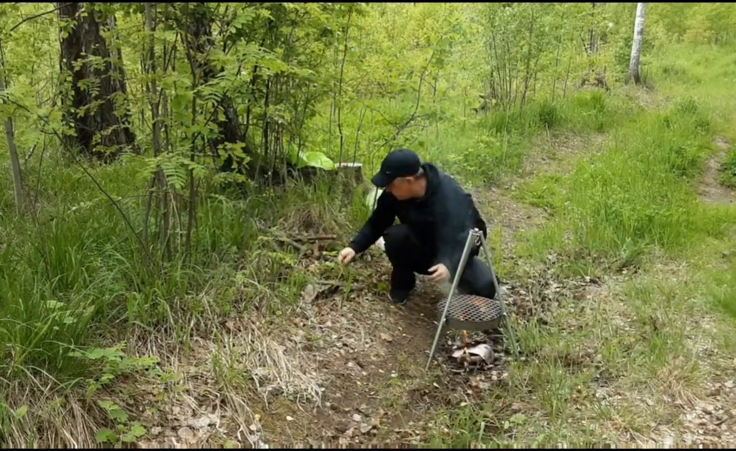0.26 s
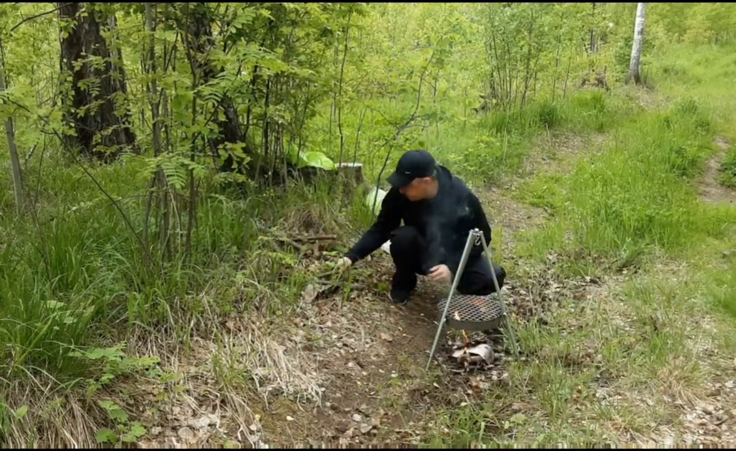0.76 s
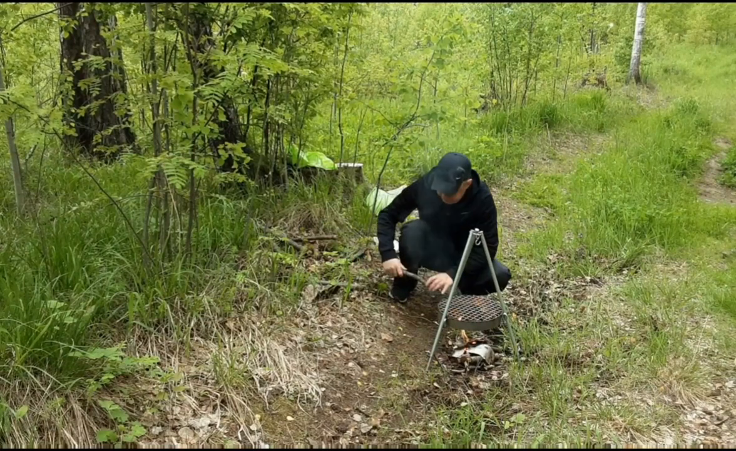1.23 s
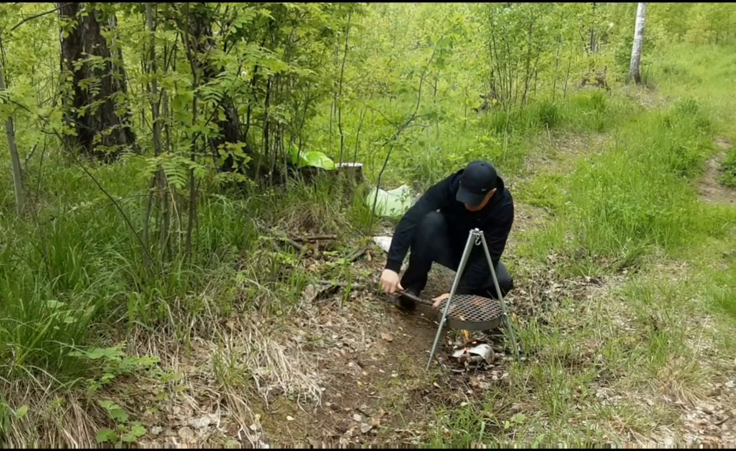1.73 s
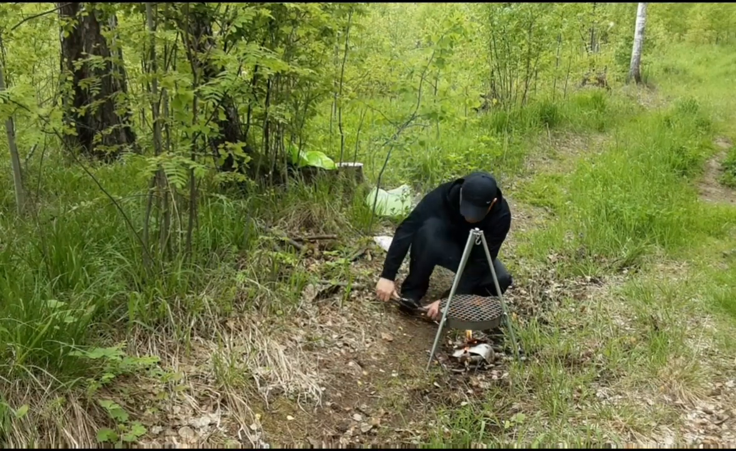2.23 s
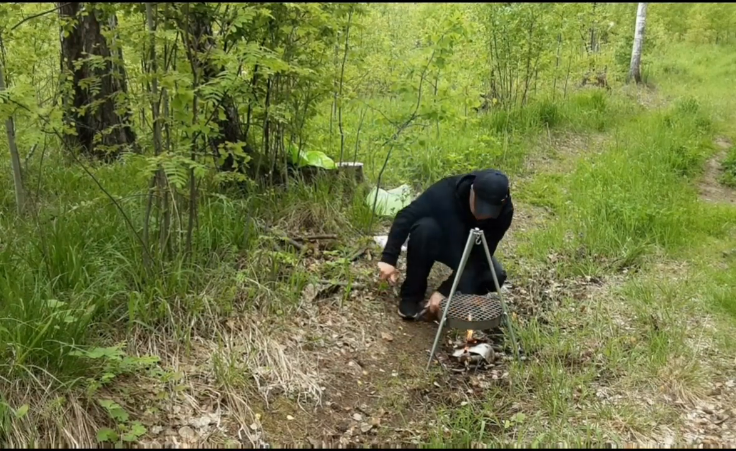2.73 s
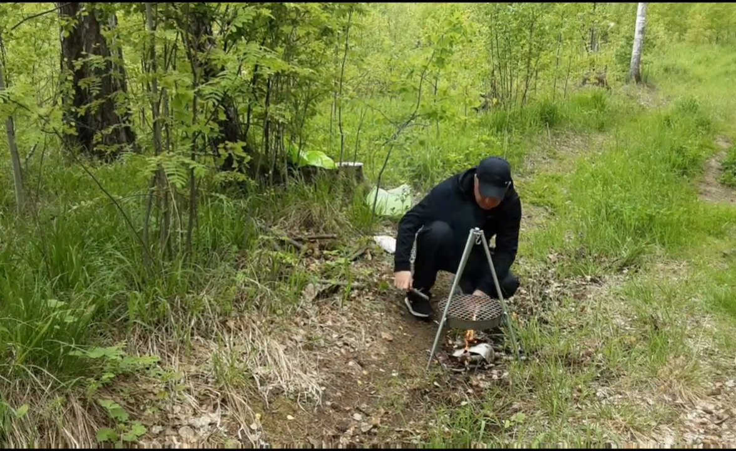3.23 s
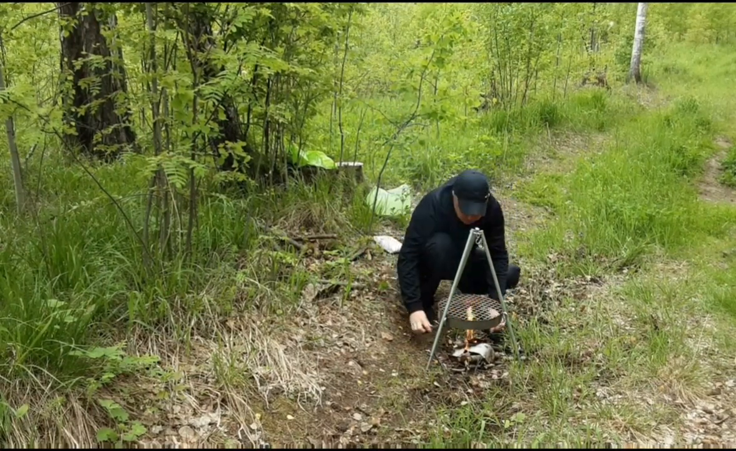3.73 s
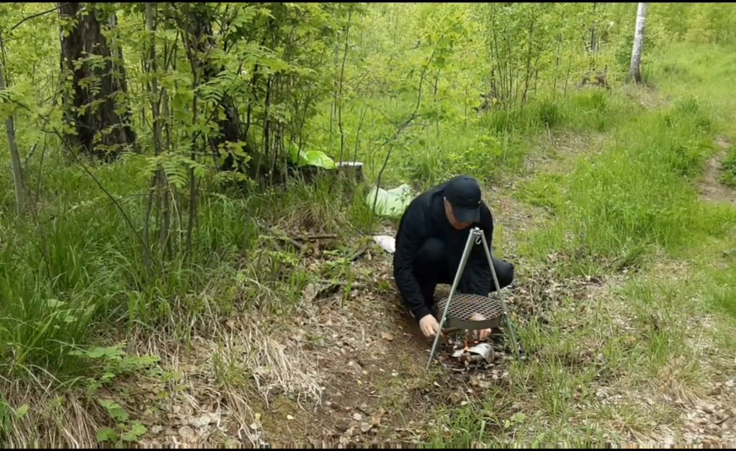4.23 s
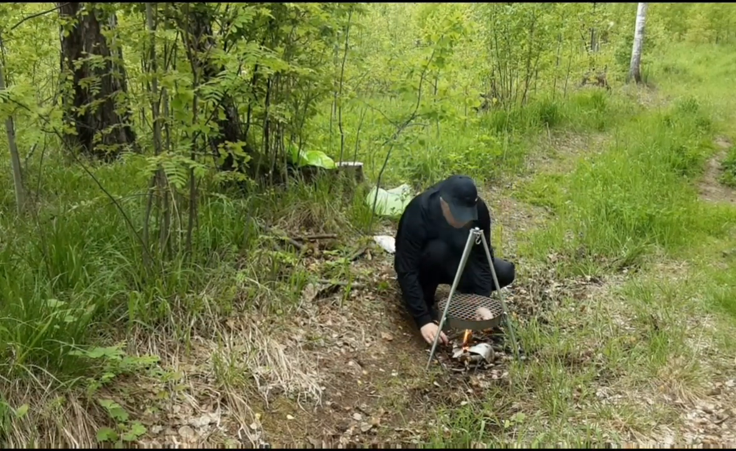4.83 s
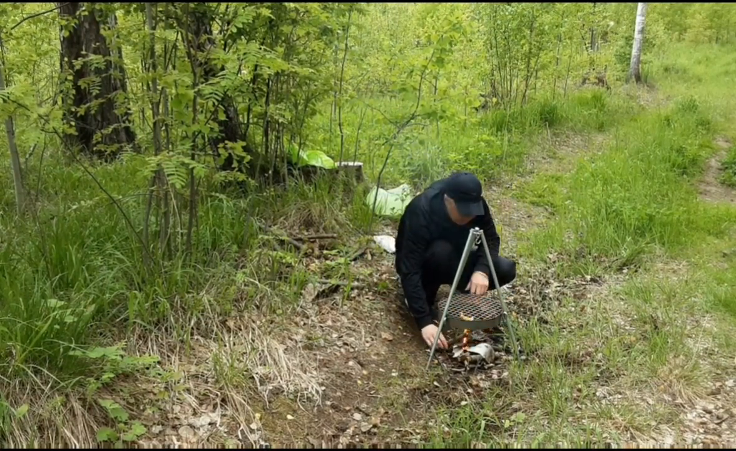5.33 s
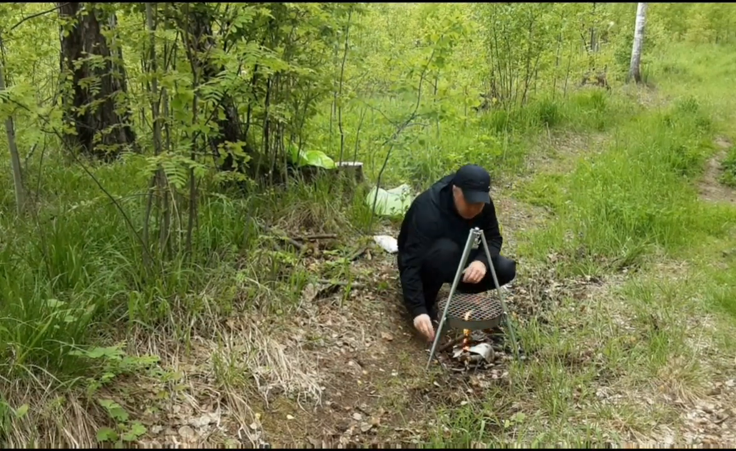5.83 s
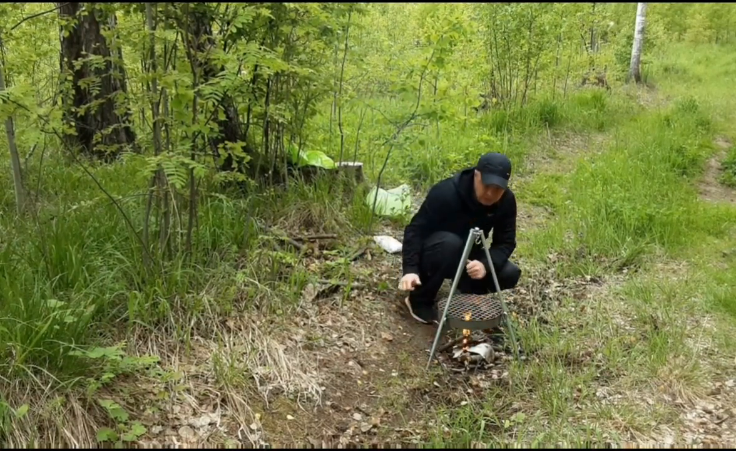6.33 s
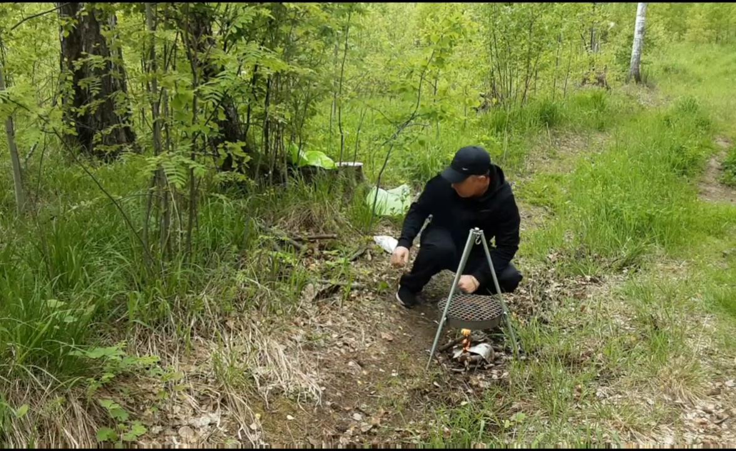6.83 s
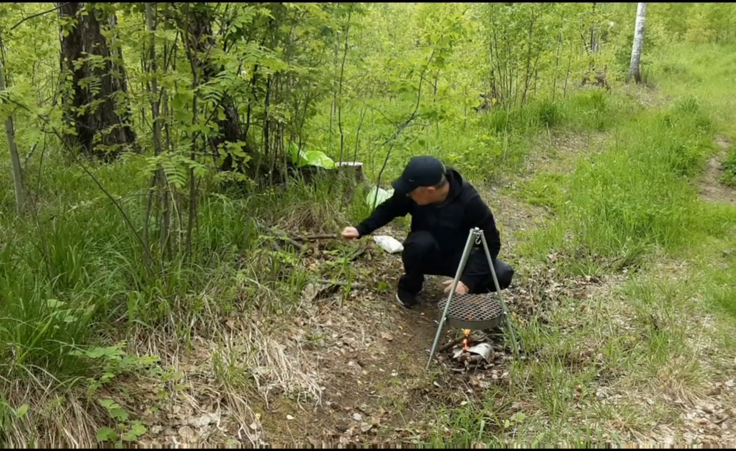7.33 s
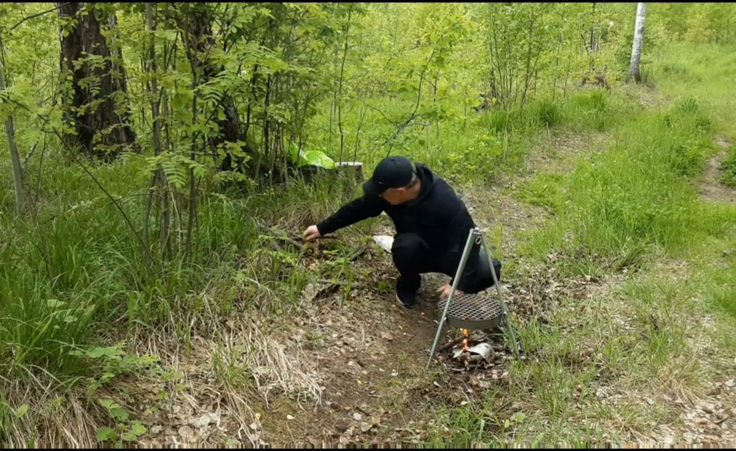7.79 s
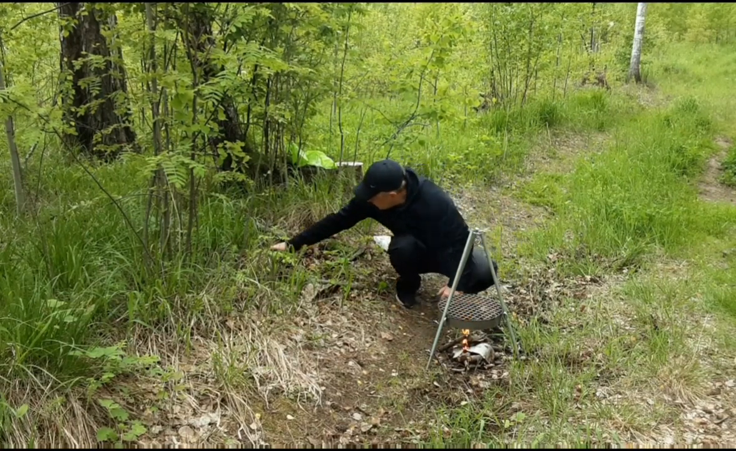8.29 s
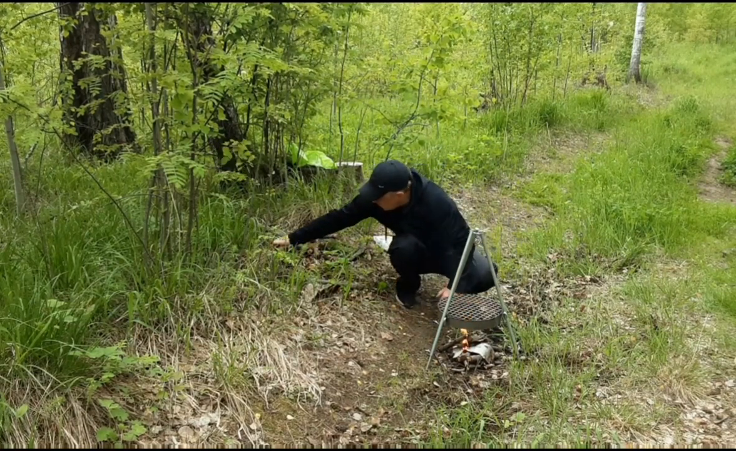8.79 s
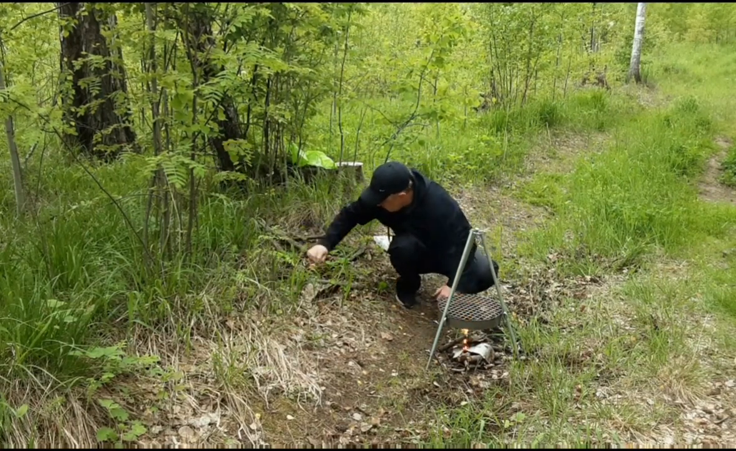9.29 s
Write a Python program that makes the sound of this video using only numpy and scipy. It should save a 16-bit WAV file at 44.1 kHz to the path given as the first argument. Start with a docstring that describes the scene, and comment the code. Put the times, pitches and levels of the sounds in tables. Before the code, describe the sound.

Someone stirs dry leaves and cracks small twigs beside a faintly ticking fire in the woods. Early on, a stick breaks with one loud snap that echoes briefly, followed a second later by a smaller crack. Light cracks and rustles continue. Throughout, a small bird repeats a high falling chirp over fainter birds, a soft foliage hiss and a distant road, all heard from a few steps away.

```python
"""Kindling at a campfire

A distant road murmurs, foliage hisses, and a small bird repeats one falling chirp, with fainter birds
further off. By a faintly ticking fire someone stirs dry leaves, cracks twigs and breaks a stick.
Each fracture excites damped modes of the wood; the trees scatter the cracks and the birdsong."""
import sys
import numpy as np
from scipy import signal
from scipy.fft import rfft, irfft, next_fast_len
from scipy.io import wavfile

SR = 44100
rng = np.random.default_rng(int(sys.argv[2]) if len(sys.argv) > 2 else 0)


def digitize_waveform(pressure):
    """Quantize a signal to 16-bit integers and store it at the path in sys.argv[1].

    Rows of a 2-D input are taken as channels; values are limited to [-1, 1].
    """
    field = np.atleast_2d(pressure).T
    bounded = np.clip(field, -1, 1)
    quanta = np.round(bounded * 32767).astype(np.int16)
    wavfile.write(sys.argv[1], SR, quanta)


N = 421155
TIME = np.arange(N) / SR

# Levels are relative within each table.
# Envelopes of tyre roar, foliage hiss and one engine note: t/s, level/dB
TYRE_LEVEL = [(0.0, -44.5), (0.42, -45), (2.47, -45), (3.62, -46.5), (4.18, -43.5), (4.39, -44.5),
              (4.92, -45), (9.55, -46)]
FOLIAGE_LEVEL = [(0.0, -66), (0.29, -66), (3.48, -70), (4.01, -67.5), (8.43, -69.5), (8.83, -67.5),
                 (9.55, -71)]
ENGINE_LEVEL = [(0, -66), (6.3, -71), (7.2, -59), (8.7, -63.5), (9.2, -52), (9.55, -52)]
# Spectra of tyres, engines, a heavy vehicle and foliage: f/Hz, level/dB
TYRE_SPECTRUM = [(90, -6.5), (115, -1.5), (146, -1.5), (182, -6.5), (235, -4), (420, -1), (660, 1),
                 (1050, -2.5), (1550, -11), (1900, -17), (2600, -28), (3200, -34.5), (4200, -41),
                 (8000, -62.5)]
RUMBLE_SPECTRUM = [(20, -39), (32, -20), (45, -11), (56, -2), (63, 2), (72, -2.5), (85, -10), (100, -18.5),
                   (160, -34)]
GROWL_SPECTRUM = [(170, -3.5), (300, -1.5), (450, -3.5)]
FOLIAGE_SPECTRUM = [(2000, -8.5), (3200, -10), (4000, -6), (5000, -4), (5900, -1.5), (6800, 0.5),
                    (7900, 1.5), (8750, -5), (9700, -9), (11000, -15.5), (13000, -16), (16000, -18)]
# Passage of the heavy vehicle: loudest t/s, half-duration/s, rise in rumble/dB
PASSAGE = (1.7, 0.51, 4.1)
# Electronic whine: f/Hz, level/dB
WHINE_TONES = [(10341, -93), (14277, -93)]
# Distant hoot: t/s, duration/s, f/Hz, level/dB
HOOT_NOTES = [(2.88, 0.57, 505, -50.5)]
# Far birds: t/s, duration/s, start f/Hz, end f/Hz, level/dB
FAR_NOTES = [(0, 0.068, 6350, 6500, -63), (.68, .25, 6700, 5500, -71), (1.95, .09, 6150, 5950, -65),
             (2.35, .09, 7200, 8000, -63), (3.66, .04, 6450, 6600, -65), (3.958, 0.14, 7900, 7560, -60),
             (4.702, 0.076, 5750, 5250, -68), (8.17, .05, 3180, 3180, -69), (8.71, 0.043, 2900, 2880, -65)]
# Near bird: t/s, final f/Hz, duration/s, level/dB
NEAR_CHIRPS = [(0.475, 5000, 0.057, -48), (1.28, 4820, 0.066, -50.5), (2.056, 4900, 0.05, -50.5),
               (2.721, 4930, 0.056, -51.5), (3.431, 4820, 0.062, -49.5), (4.086, 4810, 0.05, -48),
               (4.783, 4950, 0.04, -51), (5.514, 4860, 0.059, -50.5), (6.212, 4820, 0.055, -49.5),
               (6.943, 4930, 0.043, -51.5), (7.56, 4860, 0.059, -51.5), (8.396, 4920, 0.056, -51.5),
               (9.246, 4770, 0.068, -48)]
# Stirs of the leaf litter: t/s, core duration/s, centre f/Hz, level/dB
LEAF_STIRS = [(0, 0.61, 9000, -73), (0.7, .18, 7500, -70), (.9, 0.88, 3000, -72), (1.439, 0.14, 9000, -69),
              (2.23, 0.06, 9500, -70), (3.979, 0.5, 4800, -70), (6.47, .15, 10500, -77),
              (6.85, .04, 5000, -65), (6.962, .07, 4500, -68), (7.13, 0.097, 5000, -67),
              (8.519, 0.56, 10500, -70.5), (9.11, 0.089, 8000, -66.5)]
# Louder twig cracks: t/s, level/dB, thickness (body over top)/dB, ring (extra tick)/dB
TWIG_CRACKS = [(0.2099, -50, -1, 0), (0.7173, -45, 6, -4), (0.835, -47.5, 11, -1), (0.9547, -43, 17, -4),
               (0.9901, -50.5, 4, 12), (1.0695, -47, 22, 0.5), (1.1638, -50, 21, -2),
               (2.7147, -46.5, 19, 3), (3.0983, -50.5, -5, -5), (3.6027, -31, 5, -3.5),
               (4.1525, -50, 5, 4.5), (4.6483, -50.5, -7, 3), (4.9437, -47, -2, 0), (6.554, -49.5, -4, -1),
               (6.9591, -52, 6, 0), (7.1247, -48, 1, 6.5), (7.1965, -52, -2, 0), (7.4011, -50, -1, -3),
               (7.5188, -51.5, 8, 1), (8.5001, -52.5, 4, 2), (9.1207, -45, 0, -0.5)]
# Modes of a twig (woody body, bright tick, crisp top) and of the stick: f/Hz, level/dB, T60/s
BODY_MODES = [(1500, -3, .007), (2340, 0.5, 0.0057), (2950, -0.5, 0.0052), (3900, -3, 0.0034),
              (5040, 0, 0.0033)]
TICK_MODES = [(5950, -4, 0.0062), (6900, -0.5, 0.0082), (7900, -0.5, 0.0066), (8570, -5.5, 0.0041)]
TOP_MODES = [(10300, 2.5, 0.004), (12100, -8, .003), (14000, 5, .002)]
STICK_MODES = [(490, -4, 0.0069), (780, 0, 0.0032), (1200, -12.5, 0.015), (1590, -16.5, 0.0095),
               (2340, -26, 0.015), (3100, -24, 0.0041), (3940, -21.5, 0.006), (5780, -11.5, 0.0029),
               (7230, -2.5, 0.0033), (7940, -6, 0.0025), (9600, -19, .0015), (12000, -30, 0.0024),
               (13800, -15, .0015)]
# The two steps in which the stick gives way: t/s, level/dB
FRACTURES = [(2.5894, -0.5), (2.5916, -13)]
# Impact of its broken end on the soil: delay after the first fracture/s, f/Hz, duration/s, level/dB
SOIL_IMPACT = (.0095, 165, .013, -19)
# Spectra of tearing fibres, the long echo and its quickly absorbed top: f/Hz, level/dB
FIBRE_SPECTRUM = [(1500, -7), (2400, 0.5), (3600, -9), (5000, -1), (7000, 3), (8600, 3), (10000, 1),
                  (11500, -11), (16000, -19)]
ECHO_SPECTRUM = [(1200, -4), (2300, -4), (3600, -5), (5000, -2), (6500, 3), (7800, 6), (9300, -2.5),
                 (11000, -16), (16000, -28)]
ECHO_TOP_SPECTRUM = [(7000, -8), (9500, 5.5), (11500, -3), (13500, -4), (16000, -9)]


def from_db(db):
    """Amplitude ratio: a factor of ten for every 20 dB."""
    return 10 ** (np.asarray(db) / 20)


def rms_one(x):
    """Normalisation to unit rms."""
    return x / np.sqrt(np.mean(x ** 2) + 1e-20)


def envelope(rows):
    """Linear interpolation of a level curve at every sample."""
    return np.interp(TIME, *np.transpose(rows))


def decay(t, t60):
    """Exponential damping: 60 dB in t60 seconds."""
    return np.exp(-np.log(1000) * t / t60)


def tone(hz):
    """A sinusoid whose phase is the integral of its frequency."""
    return np.sin(2 * np.pi * np.cumsum(hz) / SR)


def add(out, s, sound):
    """Superposition of a sound from time s onward."""
    start = max(round(s * SR), 0)
    out[start:start + len(sound)] += sound[:max(len(out) - start, 0)]


def bandpass(x, low_hz, high_hz):
    """Band limiting with slopes of 6 dB per octave."""
    return signal.sosfilt(signal.butter(1, [low_hz, high_hz], "band", fs=SR, output="sos"), x)


def drift(hz):
    """Random fluctuation: low-passed noise of unit rms."""
    f = np.arange(N // 2 + 1) * SR / N
    return rms_one(irfft(rfft(rng.standard_normal(N)) / (1 + (f / hz) ** 2), N))


def coloured(x, spectrum):
    """Spectral shaping to unit rms, with roll-off beyond the ends of the table."""
    size = next_fast_len(N)
    f = np.maximum(np.fft.rfftfreq(size, 1 / SR), 1)
    hz, db = np.transpose(spectrum)
    gain = from_db(np.interp(np.log(f), np.log(hz), db))
    skirts = np.minimum(f / hz[0], 1) ** 2 * np.minimum(hz[-1] / f, 1) ** 2
    return rms_one(irfft(rfft(x, size) * skirts * gain, size)[:N])


def grains(n, per_s, spread_db):
    """A Poisson process: independent clicks of uneven size."""
    sizes = from_db(spread_db * np.minimum(rng.exponential(1, n), 5)) * rng.choice([-1, 1], n)
    return sizes * (rng.random(n) < per_s / SR)


def whine(start_s):
    """Two faint pure tones from the electronics set in and hold steady."""
    onset = np.clip((TIME - start_s) / .1, 0, 1)
    return onset * sum(from_db(db) * np.sin(2 * np.pi * hz * TIME) for hz, db in WHINE_TONES)


def road_and_foliage(roar_db, rumble_db, recede_db_per_s, growl_db, hiss_db):
    """Incoherent noises add: tyres and engines dulled by distance, and a fine hiss of foliage."""
    loudest_s, half_s, rise_db = PASSAGE
    passing = np.exp(-((TIME - loudest_s) / half_s) ** 4)
    engines_db = rumble_db - recede_db_per_s * TIME + rise_db * passing
    white = rng.standard_normal((4, N))
    roar = from_db(envelope(TYRE_LEVEL) + roar_db + .57 * drift(25)) * coloured(white[0], TYRE_SPECTRUM)
    rumble = from_db(engines_db + .4 * drift(3.3)) * coloured(white[1], RUMBLE_SPECTRUM)
    hiss = from_db(envelope(FOLIAGE_LEVEL) + hiss_db) * coloured(white[2], FOLIAGE_SPECTRUM)
    growl = from_db(growl_db) * passing * coloured(white[3], GROWL_SPECTRUM)
    return roar + rumble + growl + hiss


def engine(hz, wander, waver_db):
    """A far engine's low note, randomly modulated in amplitude and frequency, grows towards the end."""
    gain = from_db(envelope(ENGINE_LEVEL) + waver_db * drift(6.5))
    return gain * tone(hz * (1 + wander * drift(5.13)))


def hoot(wander):
    """A soft, distant note whose spectral line is broadened by random frequency modulation."""
    out = np.zeros(N)
    for s, length, hz, db in HOOT_NOTES:
        n = int(length * SR)
        pitch = hz * (1 + wander * drift(22)[:n])
        add(out, s, from_db(db) * signal.windows.tukey(n, .5) * tone(pitch))
    return out


def woods(x, near_db, near_t60, far_db, far_t60, twig_hz):
    """Scattering: ground and near stems answer at once; far branches return mostly treble, for longer."""
    t = TIME[:SR]
    near, far = rng.standard_normal((2, SR)) * np.minimum(t / 0.0041, 1) ** 2
    near = from_db(near_db) * rms_one(near * decay(t, near_t60))
    far = from_db(far_db) * rms_one(far * decay(t, far_t60))
    response = (near + bandpass(far, twig_hz, 11000)) / np.sqrt(SR)
    return signal.fftconvolve(x, response)[:N]


def far_birds(gain_db, warble_hz, reference_hz):
    """Thin glides with random frequency modulation, deeper for higher notes."""
    out, warble = np.zeros(N), drift(134)
    for s, length, start_hz, end_hz, db in FAR_NOTES:
        n = int(length * SR)
        glide = np.linspace(start_hz, end_hz, n)
        depth_hz = warble_hz * (glide / reference_hz) ** 4
        pitch = glide + depth_hz * warble[int(s * SR):][:n]
        add(out, s, from_db(db + gain_db) * signal.windows.tukey(n, .5) * tone(pitch))
    return out


def near_bird(gain_db, sweep, fall_share, flutter_hz, flutter):
    """A whistle slides down and levels off; amplitude modulation makes it flutter."""
    out = np.zeros(N)
    for s, hz, length, db in NEAR_CHIRPS:
        t = TIME[:int(length * SR)]
        pitch = hz * (1 + sweep * np.exp(-(t / length / fall_share) ** 2))
        throb = 1 + flutter * np.sin(2 * np.pi * (flutter_hz * t + rng.random()))
        swell = from_db(db + gain_db) * np.sin(np.pi * t / length) ** 0.73
        add(out, s, swell * throb * tone(pitch))
    return out


def fire(per_s, spread_db, level_db):
    """Sparse shot noise: the faint ticks of a small fire."""
    return from_db(level_db) * rms_one(bandpass(grains(N, per_s, spread_db), 6000, 15000))


def leaves(per_s, spread_db, gain_db, width_octaves, air_hz):
    """Dense shot noise under hands and shoes: high for thin leaves, lower when pressed into the soil."""
    out = np.zeros(N)
    for s, length, hz, db in LEAF_STIRS:
        n = int(1.5 * length * SR)   # the swell fades in and out around its core
        f = np.maximum(np.fft.rfftfreq(n, 1 / SR), 1)
        band = np.exp(-(np.log2(f / hz) / width_octaves / 2) ** 2)
        colour = band / np.sqrt(1 + (f / air_hz) ** 4)
        crinkle = rms_one(irfft(rfft(grains(n, per_s, spread_db)) * colour, n))
        add(out, s - length / 4, from_db(db + gain_db) * crinkle * signal.windows.tukey(n, .85))
    return out


def struck(modes, detune, attack_s):
    """Impulse response of wood: a sum of damped modes, randomly detuned at each blow."""
    t = TIME[:SR // 20]
    rings = np.zeros(len(t))
    for k, (hz, db, t60) in enumerate(modes):
        pitch = hz * (1 + detune * rng.normal())
        rings += (-1) ** k * from_db(db) * decay(t, t60) * np.sin(2 * np.pi * pitch * t)
    return rings * (1 - np.exp(-(t / attack_s) ** 2))


def twig(db, thickness_db, ring_db):
    """Free vibration of a cracked twig, woodier when thick; a weaker splinter follows."""
    parts = [(TICK_MODES, db + 1.5 + ring_db),
             (BODY_MODES, db - 6 + thickness_db / 2),
             (TOP_MODES, db - 3.5 - thickness_db / 2)]
    click, splinter = [
        sum(from_db(level) * struck(modes, detune=0.066, attack_s=0.00027) for modes, level in parts)
        for _ in range(2)]
    add(click, rng.uniform(0.0015, .004), from_db(-4.5) * splinter)
    return click


def twigs(small_per_s, small_db, spread_db):
    """Brittle fracture of handled twigs: the louder cracks, with small ones at random between them."""
    out = np.zeros(N)
    small_times = TIME[rng.random(N) < small_per_s / SR]
    small = [(s, small_db + spread_db * rng.normal(), -1, 0) for s in small_times]
    for s, db, thickness_db, ring_db in list(TWIG_CRACKS) + small:
        add(out, s, twig(db, thickness_db, ring_db))
    return out


def snap_echo(spectrum, level_db, t60):
    """Diffuse reverberation: thousands of stems and leaves return the snap as a dying wash."""
    since = np.maximum(TIME - FRACTURES[0][0], 0)
    fade = np.minimum(since / .008, 1) * decay(since, t60)
    return from_db(level_db) * fade * coloured(rng.standard_normal(N), spectrum)


def thump():
    """A heavily damped impact: the broken end meets the soil and stops within a few cycles."""
    out = np.zeros(N)
    lag, hz, length, db = SOIL_IMPACT
    t = TIME[:int(length * SR)]
    push = -np.sin(np.pi * t / length) * np.cos(2 * np.pi * hz * (t - length / 2))
    add(out, FRACTURES[0][0] + lag, from_db(db) * push)
    return out


def fibres(gain_db, t60):
    """Countless tearing fibres sum to a brief noise burst at each fracture."""
    bursts = np.zeros(N)
    for s, db in FRACTURES:
        add(bursts, s, from_db(db + gain_db) * decay(TIME[:SR // 20], t60))
    return bursts * coloured(rng.standard_normal(N), FIBRE_SPECTRUM)


def stick(gain_db):
    """Impulsive excitation: each step of the fracture sets the dry stick's modes ringing."""
    out = np.zeros(N)
    for s, db in FRACTURES:
        add(out, s, from_db(db + gain_db) * struck(STICK_MODES, detune=0.044, attack_s=.00004))
    return out


def scene():
    """Superposition in one channel: wood and leaves by the fire, birds in the trees, the road beyond."""
    crack = stick(gain_db=1)
    snap = crack + fibres(gain_db=-18.5, t60=0.011) + thump()
    snap += snap_echo(ECHO_SPECTRUM, level_db=-39.5, t60=0.51)
    snap += snap_echo(ECHO_TOP_SPECTRUM, level_db=-43, t60=0.26)
    ticks = twigs(small_per_s=2.2, small_db=-58.5, spread_db=2.5)
    scattered = woods(from_db(-2.5) * crack + ticks,
                      near_db=-9.5, near_t60=0.088, far_db=-14, far_t60=0.43, twig_hz=2000)
    birds = near_bird(gain_db=-3, sweep=.17, fall_share=.31, flutter_hz=115, flutter=0.47)
    birds += far_birds(gain_db=-3, warble_hz=130, reference_hz=6400)
    birds += woods(birds, near_db=-12, near_t60=.15, far_db=-9, far_t60=.95, twig_hz=1500)
    litter = leaves(per_s=1700, spread_db=3, gain_db=1.5, width_octaves=0.53, air_hz=12500)
    campfire = fire(per_s=45, spread_db=3, level_db=-84)
    distance = engine(hz=148.4, wander=0.0196, waver_db=2) + hoot(wander=.012)
    murmur = road_and_foliage(roar_db=0.5, rumble_db=-50.5, recede_db_per_s=.3, growl_db=-55, hiss_db=1)
    return (murmur + distance + birds + campfire + litter + scattered + ticks + snap)[None]


def record(dry):
    """Band limiting: the electronics add their whine, and a steep low-pass cuts the top."""
    top_cut = signal.ellip(10, .1, 70, 15900, fs=SR, output="sos")
    return signal.sosfilt(top_cut, dry + whine(start_s=2.7))


dry = scene()
out = record(dry)
digitize_waveform(out)
```